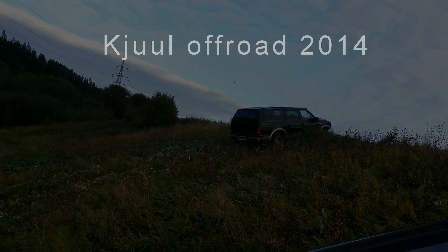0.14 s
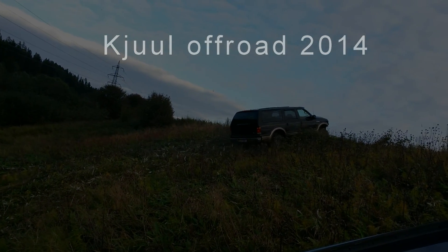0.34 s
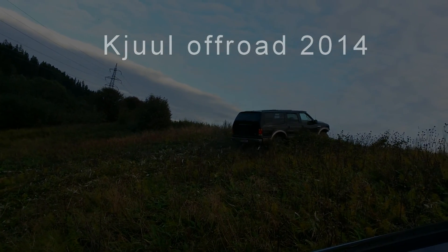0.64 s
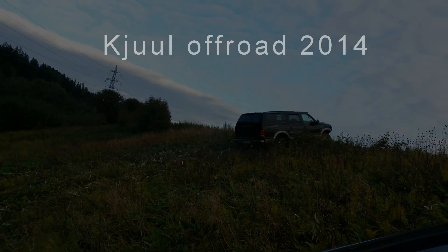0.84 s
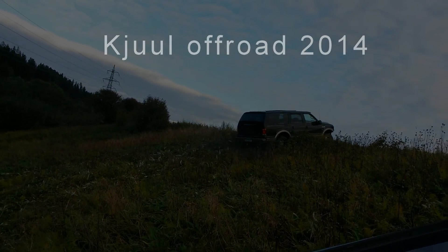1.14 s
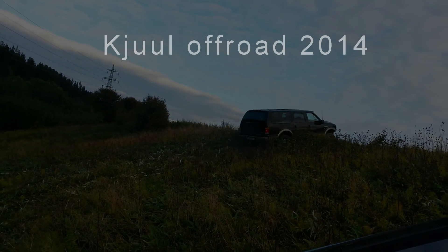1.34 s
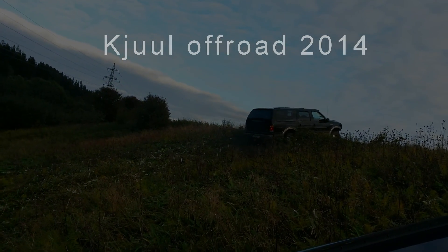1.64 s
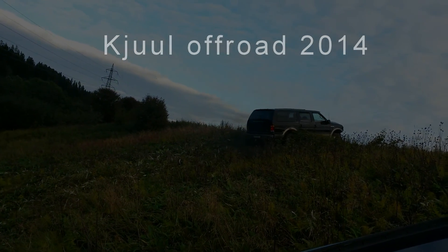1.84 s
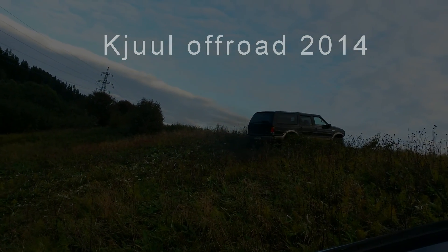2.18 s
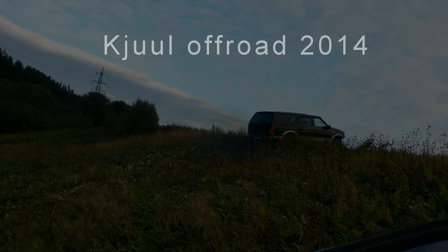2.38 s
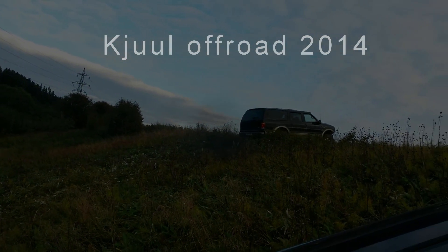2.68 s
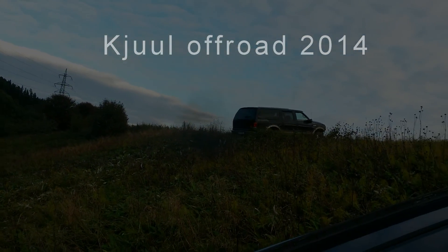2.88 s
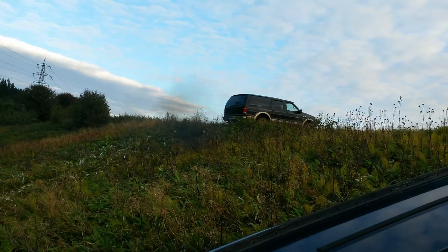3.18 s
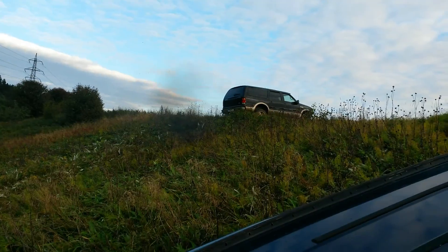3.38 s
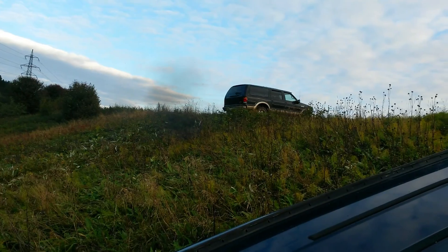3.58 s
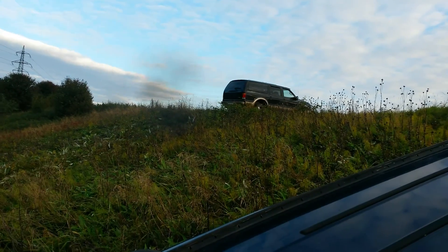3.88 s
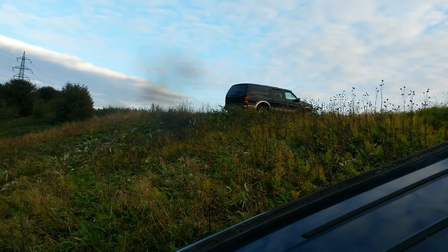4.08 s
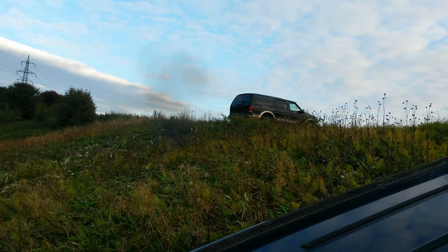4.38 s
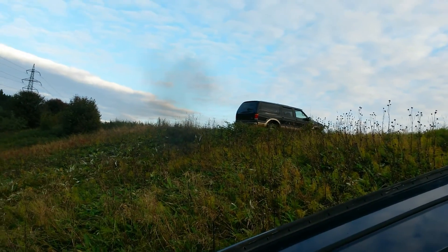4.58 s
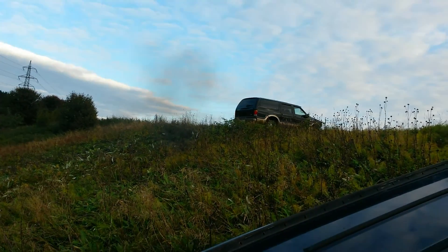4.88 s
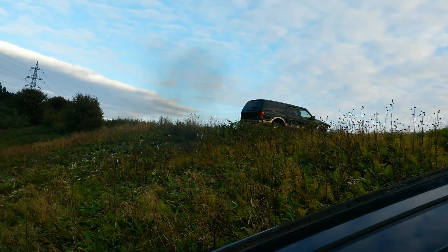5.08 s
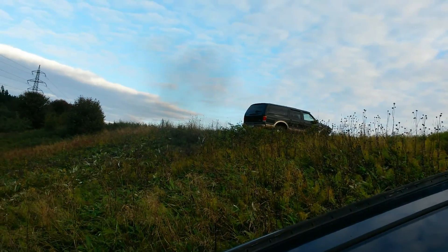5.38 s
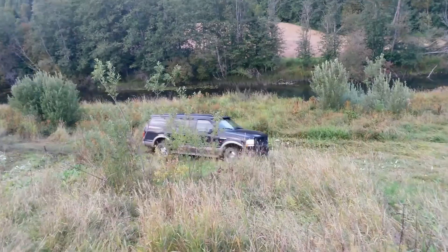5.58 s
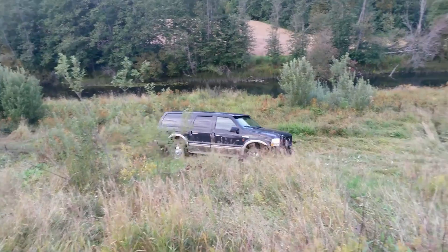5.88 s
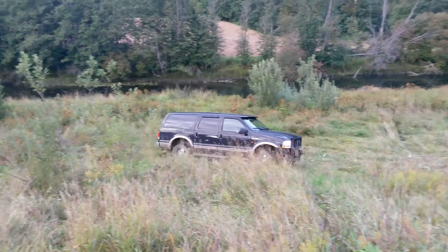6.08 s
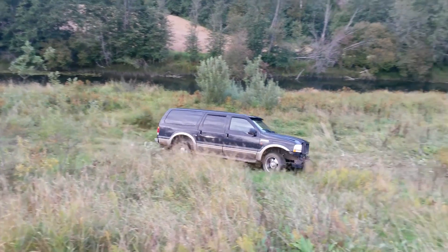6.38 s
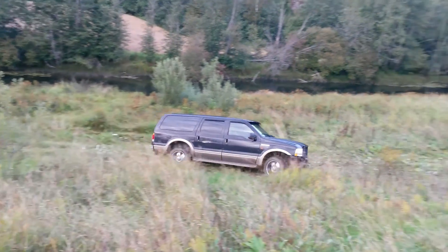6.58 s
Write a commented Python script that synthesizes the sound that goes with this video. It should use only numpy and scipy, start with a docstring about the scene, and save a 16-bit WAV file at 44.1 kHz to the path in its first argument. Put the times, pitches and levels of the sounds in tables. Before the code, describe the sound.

A loud, low, steady eight-cylinder drone with roar and hiss fills an open field, then collapses in pitch and level. Loose exhaust thumps, panel rings and a short whistling air puff lead into quiet burbling idle. The throttle blips softly twice, amid dry ticks and spring squeaks. After a hard cut to silence, the vehicle accelerates past, brighter and closer, through grass; distant stereo camera pickup.

```python
"""A grassy slope, heard by a small stereo camera some way off: a heavy eight-cylinder diesel SUV climbs at
full revs, lifts off, idles and blips twice. After a silent cut it accelerates past through tall grass.
Exhaust beats are sums of cosines; burble, roar, clatter, escaping air and rumble are shaped noise;
panel rings, whistles, hums and spring squeaks are resonant noise, some of it blended with sines."""
import sys
import numpy as np
from scipy import signal
from scipy.io import wavfile
from scipy.ndimage import uniform_filter1d

SR = 44100
rng = np.random.default_rng(int(sys.argv[2]) if len(sys.argv) > 2 else 0)


def linear_from_db(decibels):
    """Turn decibels (scalar or array-like) into linear amplitude factors; 0 gives 1."""
    return 10 ** (np.asarray(decibels, float) / 20)


def dump(signal):
    """Clip the signal to [-1, 1] and save it as 16-bit WAV at the path in sys.argv[1]."""
    limited = np.clip(np.atleast_2d(signal).T, -1, 1)
    pcm = np.round(limited * 32767).astype(np.int16)
    wavfile.write(sys.argv[1], SR, pcm)


N = 296793
CUT, BACK = 5.462, 6.192  # s, end of the first shot and start of the second, silence between


def evened(x):
    """Scales to rms 1."""
    return x / np.sqrt(np.mean(x ** 2) + 1e-20)


def read(points, hz):
    """Reads a spectrum table, straight on a log frequency axis."""
    f, value = np.transpose(points)
    return np.interp(np.log(hz + 1), np.log(f + 1), value)


def unit(magnitude):
    """Scales each frame's spectrum to unit power."""
    return magnitude / np.sqrt((magnitude ** 2).sum(0) + 1e-20)


def revs(t):
    """Firings per second and firing tone level in dB; the tone swells with the extra speed of a blip."""
    # Engine speed and loudness. Each row: time in seconds, firings per second, firing tone in dB.
    course = [(0, 209, -18.5), (.2, 205, -17), (.44, 203, -17), (.6, 209, -16), (.98, 201.5, -16),
              (1.27, 201, -18), (1.53, 195, -19), (2.0, 195, -18), (2.7, 195.5, -21), (2.81, 193, -18),
              (2.855, 185, -28), (2.89, 168, -27), (2.93, 156, -40), (2.98, 147, -38), (3.015, 141, -26),
              (3.08, 126, -33), (3.13, 118, -46), (3.25, 104, -62), (3.45, 46, -56.5), (4.3, 44.2, -59.5),
              (5.03, 46, -66.5), (5.36, 56, -55), (5.47, 57, -54), (6.19, 148, -17.5), (6.28, 154, -17),
              (6.37, 165, -21), (6.39, 168, -23), (6.42, 176, -37), (6.45, 183, -21), (6.55, 188, -20),
              (6.73, 197, -20)]
    # Throttle blips at idle. Each row: time of top speed in seconds, extra firings per second,
    # then rise, hold and time constant of the fall, all in seconds.
    blips = [(4.6, 30, .23, .09, .16), (5.26, 28, .16, .02, .03)]
    swell_db_per_firing = 0.73
    extra = 0
    for top, more, rise, hold, fall in blips:
        climb = np.interp(t, [top - rise, top], [0, 1])
        extra = extra + more * climb * np.exp(-np.maximum(t - top - hold, 0) / fall)
    s, rate, db = np.transpose(course)
    return np.interp(t, s, rate) + extra, np.interp(t, s, db) + swell_db_per_firing * extra


def firings():
    """Firing count at every sample."""
    return np.cumsum(revs(np.arange(N) / SR)[0]) / SR


def control(t, order):
    """Level in dB of one engine noise band at times t, with its random waver."""
    # Engine noise. Each row: time in seconds, then exhaust burble, roar, clatter and hiss in dB.
    bands = np.array([(0, -23.5, -22, -19, -18.5), (.4, -22.5, -22, -19.5, -18),
                      (.85, -22.5, -22, -27.5, -23.5), (1.35, -20, -22.5, -26, -21.5),
                      (1.8, -23.5, -20.5, -25.5, -23), (2.3, -23.5, -22, -21.5, -20.5),
                      (2.7, -21.5, -22.5, -19, -17), (2.88, -22, -21, -20, -19.5),
                      (2.95, -24, -28, -27.5, -24.5), (3.05, -29, -33, -33, -32.5),
                      (3.24, -32, -37, -38.5, -38), (3.44, -33.5, -40.5, -37.5, -37),
                      (3.62, -36, -43, -40.5, -42.5), (3.9, -36, -45, -47.5, -48.5),
                      (4.2, -38.5, -49, -53, -53.5), (4.45, -42, -45.5, -50.5, -45.5),
                      (5.02, -47.5, -51.5, -55, -57), (5.299, -42, -46, -51, -48),
                      (5.47, -42.5, -41.5, -48, -46.5), (6.19, -25.5, -20, -18.5, -12),
                      (6.36, -24.5, -29, -20, -22), (6.479, -23.5, -22.5, -18, -18),
                      (6.73, -24, -22.5, -18.5, -17.5)])
    # Depth of the waver in dB rms: burble, roar, clatter, hiss.
    flicker_db = [1.2, .6, .7, .8]
    flicker_s, knot_s = .03, .005
    knots = np.arange(0, N / SR + 1, knot_s)
    waver = evened(uniform_filter1d(rng.standard_normal(len(knots)), max(round(flicker_s / knot_s), 1)))
    return np.interp(t, bands[:, 0], bands[:, order]) + flicker_db[order - 1] * np.interp(t, knots, waver)


def noise(size, magnitude, patchy_db):
    """Stereo noise from random short-time spectra; magnitude(t, hz) has unit power for rms 1."""
    # Likeness of the two sides. Each row: frequency in Hz, left-right likeness as a share.
    likeness = [(60, 0.95), (290, 0.96), (620, 1), (1360, 0.9), (2500, 0.51), (4200, 0.91), (5600, 0.18),
                (7500, .62), (12000, 0.2)]
    # Balance of the two sides. Each row: frequency in Hz, left minus right in dB.
    balance = [(60, -1.5), (300, 0), (700, -0.1), (1240, 3.5), (2300, 0), (3300, 2), (4200, 8.5),
               (5500, -1), (6500, 8), (7500, 7), (8500, -3), (10000, 0.5), (12500, -2.5)]
    # Phase between the sides. Each row: frequency in Hz, radians by which left leads.
    phase_lead = [(100, 0), (700, 0.5), (1460, 1), (2240, 0.45), (3190, 2.12), (4130, 2.12), (4900, 1),
                  (5770, 5.5), (7900, 1.2), (8700, 3.5), (12000, 2)]
    # The vehicle changes side. Each row: time in seconds, share of that phase lead.
    side = [(0, 0.53), (5.5, 0.82), (6.1, -0.81), (6.8, -0.57)]
    ripple_db, ripple_s = 1.8, .25
    hop = size // 4
    t, hz = np.arange(N // hop + 5) * hop / SR, np.fft.rfftfreq(size, 1 / SR)[:, None]
    a, b, c, d, patches, ridges = rng.standard_normal((len(t), len(hz), 6)).T
    # narrow, slowly changing random ridges in the noise
    ridges = evened(uniform_filter1d(ridges, round(ripple_s * SR / hop), 1))
    patches = uniform_filter1d(patches, size // 80, 0)
    patches = evened(uniform_filter1d(patches, 3000 // hop, 1))
    same = np.clip(read(likeness, hz), -1, 1)
    common, other = a + 1j * b, c + 1j * d
    lead = np.exp(1j * read(phase_lead, hz) * np.interp(t, *np.transpose(side)))
    tilt = linear_from_db(read(balance, hz) / 2)
    left = common * lead * tilt
    right = (same * common + np.sqrt(1 - same ** 2) * other) / tilt
    z = np.array([left, right]) * magnitude(t, hz) * linear_from_db(patchy_db * patches + ripple_db * ridges)
    return signal.istft(z, nperseg=size, noverlap=size - hop)[1][:, :N] * np.sqrt(2 / 3)


def exhaust():
    """Firing pattern of unequal cylinders: eighths of the firing tone in step, coloured by the pipe."""
    # Unequal cylinders: dB of each eighth of the firing tone, whole multiples first, repeating.
    cylinders = [0, -18, -30.5, -15, -12.5, -20, -16, -25.5]
    # Colour of the exhaust pipe. Each row: frequency in Hz, level in dB.
    pipe = [(25, -35.5), (45, -19.5), (60, -21), (77, -10.5), (95, -7), (122, 4.5), (150, -4.5),
            (200, -2.5), (245, -6.5), (300, -12), (420, -22.5), (800, -59)]
    # Dulling of overtones. Each row: firings per second, dB per octave above the firing tone.
    dulling = [(45, -6.5), (61, -9.5), (80, -22), (200, -18.5)]
    beat_turns = .58  # all eighths share this phase: the one beat per cycle is a dip in pressure
    step = 20  # samples per point: the sum is made at a low rate
    t = np.arange(0, N + step, step) / SR
    rate, tone_db = revs(t)
    share = np.arange(1, 41)[:, None] / 8
    db = np.roll(np.resize(cylinders, len(share)), -1)[:, None]
    db = db + read(pipe, share * rate) - read(pipe, rate)
    db += tone_db + read(dulling, rate) * np.maximum(np.log2(share), 0)
    waver = evened(uniform_filter1d(rng.standard_normal((len(share), len(t))), 160, axis=1))
    db += waver * np.where(share == 1, .7, 1.3)
    phase = 2 * np.pi * (share * np.cumsum(rate) * step / SR + beat_turns)
    tone = (np.sqrt(2) * linear_from_db(db) * np.cos(phase)).sum(0)
    return signal.resample_poly(tone, step, 1)[:N] * linear_from_db([[.1], [-.1]])


def burble():
    """Turbulent gas in the pipe; every firing blows a different amount."""
    # Burble under load. Each row: frequency in Hz, relative dB per Hz.
    load_burble = [(30, -37), (60, -14), (90, -9.5), (140, 5), (200, -1.5), (260, -0.5), (320, -3),
                   (450, -51)]
    # Burble at idle. Each row: frequency in Hz, relative dB per Hz.
    idle_burble = [(29, -40), (50, -30), (114, 4.5), (150, -1), (183, 7.5), (221, -4), (248, -6),
                   (275, -17), (330, -29), (430, -47), (730, -120)]

    def magnitude(t, hz):
        idling = (t > 2.95) & (t < BACK - .3)
        db = np.where(idling, read(idle_burble, hz), read(load_burble, hz))
        return unit(linear_from_db(db)) * linear_from_db(control(t, order=1))
    turns = firings()
    each_db = 0.53 * rng.standard_normal(int(np.ceil(turns[-1] + 2)))
    blow_db = np.interp(turns, np.arange(turns[-1] + 2), each_db)
    return linear_from_db(blow_db) * noise(2048, magnitude, patchy_db=0.66)


def engine_noise():
    """Exhaust roar, combustion clatter and the hiss of fan and grass, pulsing a little with each firing."""
    # Noise colour on the climb. Each row: frequency in Hz, relative dB per Hz.
    climb_noise = [(160, -20.5), (280, -3.5), (460, -10), (570, -5.5), (890, -8.5), (1320, -11),
                   (2170, -16), (3170, -23), (4420, -18), (5470, -26), (7370, -15.5), (8000, -18.5),
                   (8980, -26.5), (10800, -30.5), (14500, -52.5)]
    # Noise colour at idle. Each row: frequency in Hz, relative dB per Hz.
    idle_noise = [(160, -36.5), (280, -6.5), (409, -11), (491, -11.5), (533, -14.5), (1020, -14.5),
                  (1340, -10), (1670, -17.5), (1810, -14.5), (2970, -19.5), (4070, -13), (5750, -18),
                  (7370, -11.5), (8550, -19), (14500, -46)]
    # Noise colour of the pass. Each row: frequency in Hz, relative dB per Hz.
    pass_noise = [(160, -36), (280, -6.5), (452, -23), (551, -9.5), (742, -7.5), (890, -13), (966, -19.5),
                  (1320, -10.5), (1560, -18.5), (2000, -13), (2320, -19), (3170, -17), (5660, -15),
                  (7490, -10.5), (14500, -31)]
    roar_top_hz, clatter_top_hz = 890, 2940

    def magnitude(t, hz):
        idling = np.clip((t - 2.85) / 0.45, 0, 1)
        db = (1 - idling) * read(climb_noise, hz) + idling * read(idle_noise, hz)
        shape = linear_from_db(np.where(t > CUT + .2, read(pass_noise, hz), db))
        low, high = (1 / (1 + (hz / top) ** 6) for top in (roar_top_hz, clatter_top_hz))
        power = 0
        for order, share in ((2, low), (3, high - low), (4, 1 - high)):
            power = power + (unit(shape * np.sqrt(share)) * linear_from_db(control(t, order))) ** 2
        return np.sqrt(power)
    pulse = 1 + .08 * np.cos(2 * np.pi * firings())
    return noise(512, magnitude, patchy_db=.8) * pulse


def rumble():
    """A faint lumpy low air rumble, stronger in the second shot, and the camera's own faint hiss."""
    # Low air rumble. Each row: frequency in Hz, relative dB per Hz.
    air = [(12, -57), (20, -25), (70, -13.5), (91, -41.5), (150, -120)]
    # The camera's own hiss. Each row: frequency in Hz, relative dB per Hz.
    hiss = [(3000, -27), (8000, -17.5), (10000, -1), (14600, -7.5)]
    air_db, hiss_db, second_shot_db = -51.5, -62, 12.5  # the last is added to the rumble alone

    def magnitude(t, hz):
        low = linear_from_db(air_db) * unit(linear_from_db(read(air, hz)))
        high = linear_from_db(hiss_db) * unit(linear_from_db(read(hiss, hz)))
        return low * linear_from_db(np.where(t > CUT, second_shot_db, 0)) + high
    return noise(4096, magnitude, patchy_db=1.5)


def thumps():
    """Single exhaust thumps after the lift: a few cycles of the pipe, soft at both ends."""
    # Each row: start in seconds, peak of the envelope in dB, frequency in Hz.
    beats = [(3.241, -24.5, 104), (3.284, -24, 127), (3.288, -23, 194), (3.411, -27, 131),
             (3.534, -32, 181), (3.659, -29, 187), (3.779, -36, 201), (3.844, -29, 153), (3.939, -33, 202),
             (4.612, -43, 101), (4.676, -34, 124), (5.054, -37, 113.6), (5.285, -35, 110),
             (5.344, -31, 112), (5.39, -38, 116), (5.436, -37, 109)]
    peak_s = .009
    out, t = np.zeros(N), np.arange(3000) / SR
    envelope = t / peak_s * np.exp(1 - t / peak_s)
    for s, db, hz in beats:
        out[round(s * SR):][:len(t)] += linear_from_db(db) * np.sin(2 * np.pi * hz * t) * envelope
    return out


def resonate(x, hz, width):
    """Narrow gliding resonance: shifts the curve hz down to zero, smooths, and shifts back."""
    turn, r = np.exp(2j * np.pi * np.cumsum(hz) / SR), np.exp(-np.pi * width / SR)
    return 2 * (turn * signal.lfilter([1 - r], [1, -r], x / turn)).real


def lines(rows, scoop_share=0, swell_db=-17, fade_db=-4.5):
    """Lines from fuzzy to clean: noise through a resonance that may glide, blended with a sine."""
    scoop_s, swell_share = .009, 0.13  # time constant of the scoop; share of the length spent swelling
    out = np.zeros(N)
    for s, length, from_hz, to_hz, db, width, clean in rows:
        t = np.arange(0, length, 1 / SR)
        hz = from_hz + (to_hz - from_hz) * t / length
        hz = hz * (1 - scoop_share * np.exp(-t / scoop_s))
        fuzz = evened(resonate(resonate(rng.standard_normal(len(t)), hz, width), hz, width))
        sine = np.sin(2 * np.pi * np.cumsum(hz) / SR)
        tone = np.sqrt(1 - clean) * fuzz + np.sqrt(2 * clean) * sine
        swell = linear_from_db(db + np.interp(t / length, [0, swell_share, 1], [swell_db, 0, fade_db]))
        out[round(s * SR):][:len(t)] += tone * swell * signal.windows.tukey(len(t), .08)
    return out * linear_from_db([[1.5], [-1.5]])  # leans to the left


def rings():
    """A body panel rings now and then: noise in a fixed resonance, with no clean part."""
    # Each row: start in seconds, length in seconds, pitch in Hz, level in dB at the top of the swell,
    # width in Hz.
    panel = [(3.26, .14, 1390, -43, 110), (3.34, .2, 1230, -47, 220), (3.4, .2, 1450, -49, 260),
             (3.28, .24, 1850, -48, 260), (3.3, .16, 2350, -51, 260), (3.28, .3, 4150, -50, 300),
             (3.76, .3, 1330, -51, 320), (3.85, .4, 860, -54, 90), (4.38, .3, 1330, -55, 200),
             (4.74, .1, 1320, -55, 130), (5.05, .1, 1250, -53, 70), (5.17, .11, 1300, -54, 180),
             (5.3, .17, 1270, -51, 170)]
    return lines([(s, length, hz, hz, db, width, 0) for s, length, hz, db, width in panel])


def puffs():
    """Air escapes with a quick rise, fades, and is shut off."""
    # Bursts of escaping air; a row whose shutting time is before its start makes no sound.
    # Each row: start in seconds, level in dB that the decay starts from, rise in seconds,
    # time to fall 60 dB in seconds, time of shutting in seconds, brightness in dB per octave.
    bursts = [(3.668, -23.5, 0.029, 0.47, 4.0, 2), (3.675, -37, 0.03, 2.9, 4.04, 5),
              (6.1, -56, 0.057, 2.5, 5, 2.5), (4.9, -51.5, .02, 1.5, 4.8, 3), (5.4, -36, 0.01, 0.23, 4, -4),
              (3.29, -32, .01, 0.23, 4, 2.5)]
    # Colour of the air. Each row: frequency in Hz, relative dB per Hz before the brightness.
    colour = [(240, -45), (400, 0), (576, 12.5), (817, -2), (1400, 5), (1530, 0), (2400, -13), (3660, -10),
              (5040, -22), (6850, -11), (8500, -11), (10100, -20.5), (12400, -29), (13200, -56)]

    def magnitude(t, hz):
        power = 0
        for s, db, rise, t60, shut, bright_db in bursts:
            age = np.maximum(t - s, 0)
            opening, closing = np.clip(age / rise, 0, 1), np.clip((shut - t) / .05, 0, 1)
            swell = linear_from_db(db - 60 * age / t60) * opening * closing
            shape = unit(linear_from_db(read(colour, hz) + bright_db * np.log2(hz + 1)))
            power = power + (swell * shape) ** 2
        return np.sqrt(power)
    return noise(256, magnitude, patchy_db=1.2)


def whistles():
    """Narrow and wide resonances, most of them gliding, some blended with a sine."""
    # Three in the air burst, the turbo running down, faint 600 Hz hums and two short steady peeps.
    # Each row: start in seconds, length in seconds, first and last pitch in Hz, level in dB at the top
    # of the swell, width in Hz, clean share from 0 to 1.
    glides_and_peeps = [(3.67, .078, 3440, 3700, -39.5, 300, .1), (3.668, .13, 6700, 6950, -38, 900, 0),
                        (3.76, .1, 4000, 4100, -52, 260, 0), (4.0, .28, 7950, 7020, -60, 130, .15),
                        (4.69, .19, 602, 592, -54, 20, .75), (5.12, .34, 590, 610, -52, 90, 0),
                        (4.795, .04, 3270, 3270, -64, 100, .2), (4.87, .04, 3250, 3250, -64, 100, .2)]
    return lines(glides_and_peeps)


def hums():
    """Low tones that wander in the pipe at idle, as narrow resonances with a sine."""
    # Each row: start in seconds, length in seconds, first and last pitch in Hz, level in dB at the top
    # of the swell.
    pipe_tones = [(3.9, .25, 190, 170, -41), (3.93, .45, 92, 88, -51), (4.19, .22, 150, 150, -43),
                  (4.22, .2, 192, 196, -44), (5.13, .11, 108, 134, -40)]
    width_hz, clean = 12, .6
    return lines([(*row, width_hz, clean) for row in pipe_tones])


def ticks():
    """Dry ticks near the camera: short bright snaps of fast-fading noise in a high band."""
    # Each row: start in seconds, level in dB at the start, before the band filter.
    snaps = [(4.317, -35), (4.3301, -43)]
    out, t = np.zeros((2, N)), np.arange(600) / SR
    for s, db in snaps:
        start = round(s * SR)
        out[:, start:start + len(t)] += rng.standard_normal((2, len(t))) * linear_from_db(db - 60 * t / 0.0246)
    return signal.sosfilt(signal.butter(2, (6500, 13000), "bandpass", fs=SR, output="sos"), out)


def squeaks():
    """Squeaks of the springs, most of them scooping up to pitch, at an even level."""
    # Each row: start in seconds, length in seconds, first and last pitch in Hz, level in dB,
    # depth of the scoop as a share of the pitch.
    springs = [(5.042, .08, 4070, 4020, -58.5, .2), (5.224, .09, 4200, 3960, -59, .15),
               (5.335, .08, 3940, 4020, -59, 0)]
    width_hz, clean = 140, .45
    return sum(lines([(*row[:5], width_hz, clean)], row[5], swell_db=0, fade_db=0) for row in springs)


def scene():
    """All sources together."""
    engine = exhaust() + burble() + engine_noise() + thumps()
    tones = rings() + whistles() + hums() + squeaks()
    return engine + rumble() + tones + puffs() + ticks()


def speckle(x):
    """The top treble breaks into specks: spots far weaker than the treble below them fall silent."""
    # Each row: frequency in Hz, dB against the 5-9 kHz level that a spot must reach to be heard.
    bar = [(8000, -40), (9500, -27), (11000, -15), (12500, -23), (14500, -18)]
    ragged_db = 5  # rms by which that bar wanders from spot to spot
    hz, _, z = signal.stft(x, SR, nperseg=1024)
    power = (abs(z) ** 2).sum(0)
    spot = uniform_filter1d(uniform_filter1d(power, size=3, axis=0), size=3, axis=1)
    treble = uniform_filter1d(spot[(hz > 5000) & (hz < 9000)].mean(0), size=9)
    wander = uniform_filter1d(rng.standard_normal(spot.shape), size=5, axis=0)
    wander = evened(uniform_filter1d(wander, size=6, axis=1))
    bar_db = read(bar, hz)[:, None] + ragged_db * wander
    kept = (spot > treble * linear_from_db(bar_db) ** 2) | (hz[:, None] < bar[0][0])
    return signal.istft(z * kept, SR, nperseg=1024)[1][:, :N]


def band_limit(x):
    """A steep low-pass at the top of the band."""
    return signal.sosfilt(signal.butter(12, 14680, fs=SR, output="sos"), x)


def record(dry):
    """Thins the top treble; the edit then cuts to silence and fades the second shot in."""
    fade_out_s, fade_in_s = .003, 0.13
    t = np.arange(N) / SR
    first_shot = np.clip((CUT - t) / fade_out_s, 0, 1)
    second_shot = np.clip((t - BACK) / fade_in_s, 0, 1)
    mix = speckle(dry) * np.where(t < BACK, first_shot, second_shot)
    return band_limit(mix)


dry = scene()
out = record(dry)
dump(out)
```